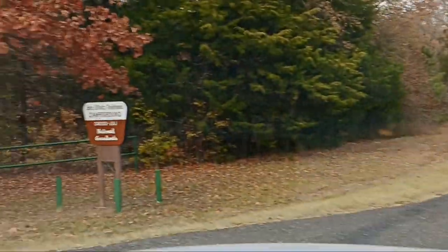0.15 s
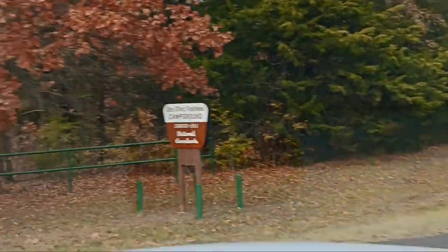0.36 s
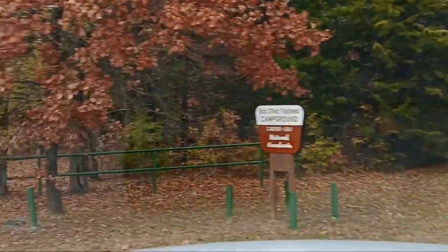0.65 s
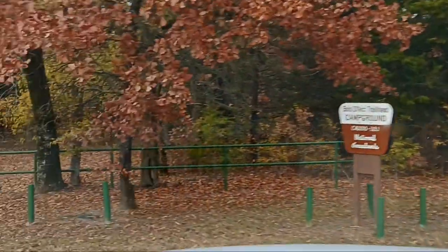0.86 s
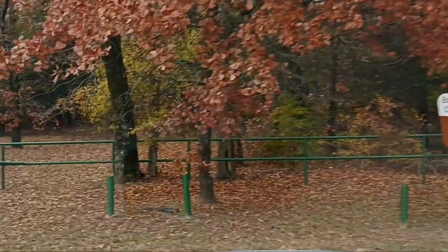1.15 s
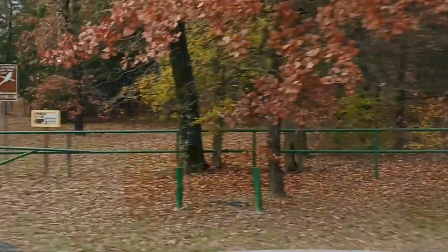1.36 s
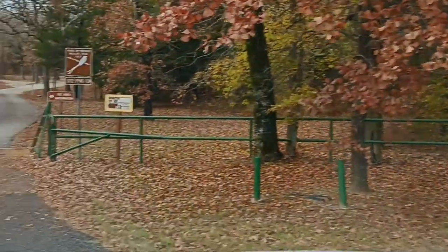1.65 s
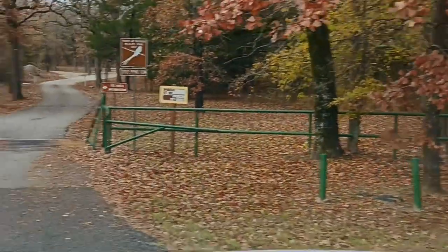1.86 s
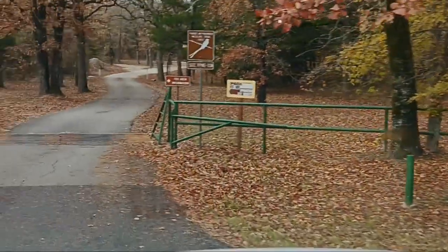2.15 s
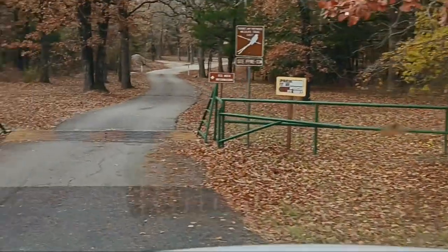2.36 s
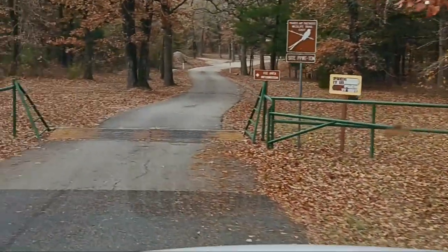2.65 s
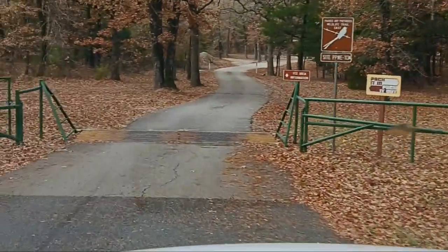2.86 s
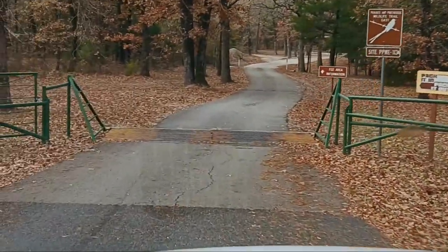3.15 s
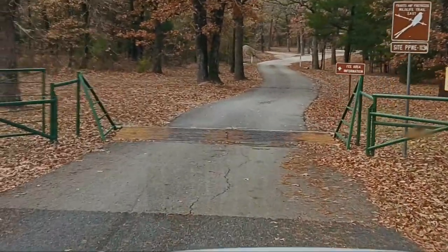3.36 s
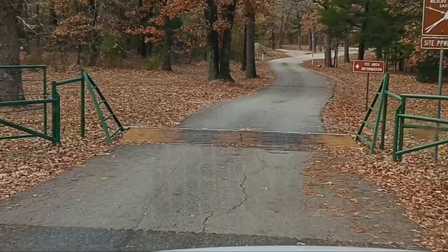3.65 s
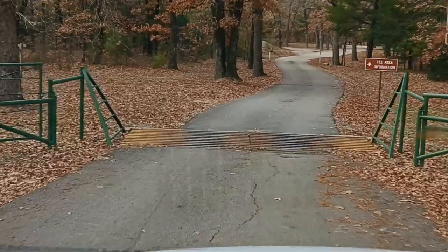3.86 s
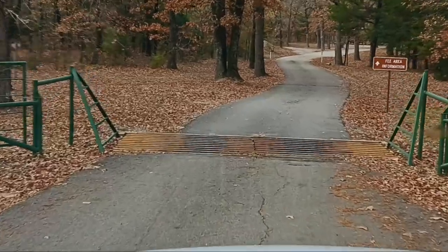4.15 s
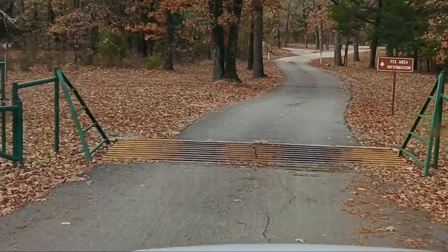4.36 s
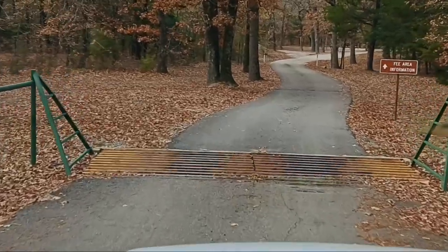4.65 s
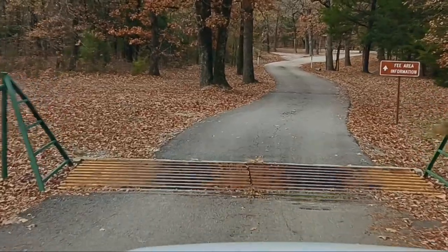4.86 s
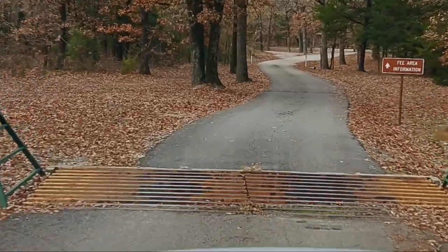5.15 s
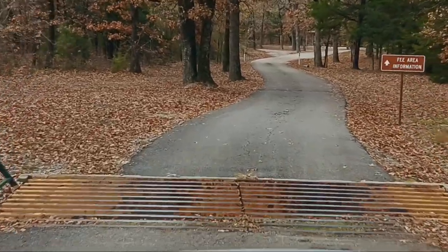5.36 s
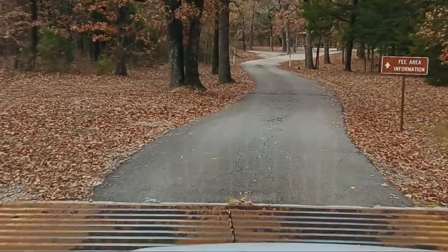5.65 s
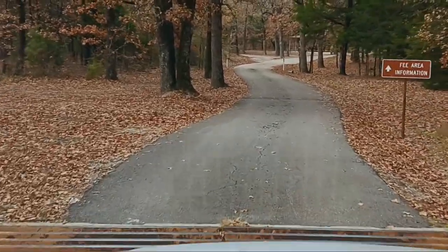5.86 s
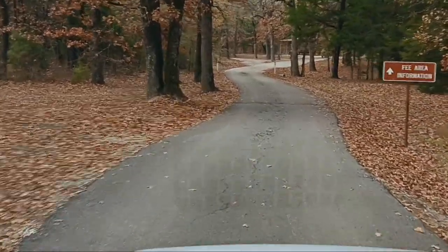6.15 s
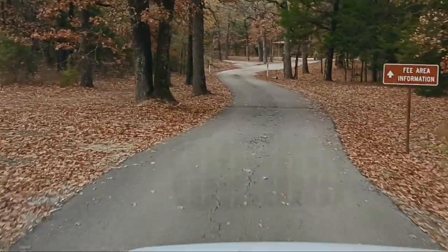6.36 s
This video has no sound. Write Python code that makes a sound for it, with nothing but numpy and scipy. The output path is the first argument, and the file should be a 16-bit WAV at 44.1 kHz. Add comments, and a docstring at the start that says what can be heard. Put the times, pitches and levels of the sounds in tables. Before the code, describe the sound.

Inside a slowly turning car, low engine hum and road rumble underlie an even turn-signal tick that snaps off, then hand rustles and small creaks.

```python
"""Inside a car that turns slowly into a lane, heard at two microphone ports near the windscreen.
From the start the engine hums on its firing orders over banded road rumble, buzzing panels and a hiss of air.
Trim snaps follow, then the struck modes of an indicator relay tick on and off until the stalk snaps back;
palms slide round the wheel as patchy hiss with squeaks, while the steering pump whines up and eases away.
Creaks go on to the end. Each port colours everything with its own cavity resonance."""
import sys
import numpy as np
from scipy import signal
from scipy.fft import rfft, irfft, next_fast_len
from scipy.io import wavfile
from scipy.ndimage import uniform_filter1d

SR = 44100
rng = np.random.default_rng(int(sys.argv[2]) if len(sys.argv) > 2 else 0)


def master(y):
    """Save y as 16-bit WAV."""
    cut = np.clip(np.atleast_2d(y).T, -1, 1)
    pcm = np.round(cut * 32767)  # scale
    wavfile.write(sys.argv[1], SR, pcm.astype(np.int16))


N = 286650
T = np.arange(N) / SR  # scene time, s
SIZE = next_fast_len(N + 8192)
HZ = np.arange(SIZE // 2 + 1) * SR / SIZE
BURST = np.arange(4500) / SR  # time within a short sound, s


def undb(db):
    """dB to gain."""
    return 10 ** (np.asarray(db) / 20)


def unit(x):
    """Scale to rms 1."""
    return x / np.sqrt(np.mean(x ** 2))


def curves(table):
    """Interpolate the columns of a table over time, sample by sample."""
    s, *columns = np.transpose(table)
    return [np.interp(T, s, column) for column in columns]


def walk(rate):
    """Random levels held 1 / rate s and slewed twice; spread near 1."""
    held = np.repeat(rng.standard_normal(int(N / SR * rate) + 2), 8)
    once = uniform_filter1d(held, size=8)
    slewed = unit(uniform_filter1d(once, size=8))
    return np.interp(T * rate * 8, np.arange(len(held)), slewed)


def ring(x, hz, width_hz):
    """One resonance, gain 1 at its centre."""
    return signal.lfilter(*signal.iirpeak(hz, hz / width_hz, fs=SR), x)


def late_left(x):
    """The sound from floor and engine bay reaches the right port first, the left 0.95 ms later."""
    lag = int(0.00095 * SR)
    return np.array([np.pad(x, (lag, 0), mode="reflect")[:N], x])


def decay(t, t60):
    """Exponential fall by 60 dB in t60 s."""
    return 1000. ** (-t / t60)


def cabin(t60, rise):
    """Envelope of the dense early echoes of glass and seats: exponential rise, then decay."""
    return (1 - np.exp(-BURST / rise)) * decay(BURST, t60)


def reflections():
    """Early echoes at both ports: noise in clumps under a millisecond long; rms 1 over both."""
    clumps = np.repeat(rng.standard_normal((2, len(BURST) // 30)), 30, axis=1)
    return unit(undb(4 * clumps) * rng.standard_normal((2, len(BURST))))


def add(out, s, burst):
    """Mix a burst in at time s."""
    i = int(s * SR)
    out[:, i:i + burst.shape[1]] += burst[:, :N - i]


def engine():
    """Orders of the engine, wavering several times a second in pitch and level; the pump whines in turns."""
    # Engine speed and load. Each row: time in seconds, base order (the lowest hum tone) in Hz, load in dB.
    speed_load = [(0, 33.38, 0.5), (.4, 34.37, 1), (1, 34.93, -0.5), (1.45, 35.17, -0.5), (1.74, 37.48, -3),
                  (1.92, 37.23, -3), (2.1, 36.29, -4.5), (2.4, 35.91, -2.5), (3.1, 35.17, -2.5),
                  (3.6, 35.46, -2), (4.4, 34.96, -2), (4.75, 35.6, -3), (5.3, 35.5, -4), (5.9, 35.09, -3),
                  (6.5, 34.8, -4.5)]
    # Orders that follow the load. Each row: multiple of the base order, level in dB.
    loaded_orders = [(1, -43.5), (2, -20), (3, -24.5)]
    # Orders at steady mean level, whatever the load. Each row: multiple of the base order, level in dB.
    steady_orders = [(1.5, -45), (2.5, -53.5), (3.5, -56.5), (4, -37), (4.5, -39), (5, -52.5), (6, -49.5),
                     (6.5, -49.5), (7.5, -47), (9, -54)]
    # The seventh order booms while the wheel is turned in. Each row: time in seconds, level in dB.
    seventh = [(0, -48.5), (.7, -47.5), (.9, -38.5), (1.5, -39.5), (1.8, -49.5), (6.5, -54)]
    pump_order, full_lock_s = 8.55, 1.74
    pump_peak_db, pump_idle_db = -33.5, -55
    pump_rise_db_s, pump_ease_db_s = 83.5, 5.5

    hz, load_db = curves(speed_load)
    phase = 2 * np.pi * np.cumsum(hz * (1 + 0.0016 * walk(9))) / SR
    # the pump is loudest at full lock, then eases as the wheel unwinds
    since = T - full_lock_s
    pump_db = pump_peak_db + np.minimum(pump_rise_db_s * since, -pump_ease_db_s * since)
    pump_db = np.maximum(pump_db, pump_idle_db)
    orders = [(multiple, db + load_db) for multiple, db in loaded_orders]
    orders += [(pump_order, pump_db), (7, curves(seventh)[0])]
    orders += steady_orders
    hum = 0
    for multiple, db in orders:
        hum = hum + undb(db + 0.39 * walk(8.1)) * np.sin(multiple * phase)
    return late_left(np.sqrt(2) * hum)


def road_levels():
    """Running levels of boom, floor pan and roar: the uneven lane makes them swell, sink and jolt."""
    # Road noise through the body. Each row: time in seconds, then suspension boom, floor pan
    # and tyre roar, each in dB.
    rumble = [(0, -23.5, -34, -57), (.9, -25.5, -34.5, -52), (1.6, -27, -36.5, -56),
              (2.4, -31.5, -39.5, -55.5), (3.2, -28.5, -39.5, -59.5), (4.0, -31.5, -39.5, -58),
              (4.6, -28.5, -39, -60.5), (5.4, -30, -39.5, -59), (6.5, -26, -39.5, -59.5)]
    # Bumps in the lane. Each row: peak time in seconds, then the shift of boom, floor pan
    # and roar against the running level, each in dB; a negative shift is a dip.
    bumps = [(0.159, 9.5, 1, 5), (.5, 2.5, -0.5, 6.5), (1.0, 2, -1, -3.5), (1.81, -3, 2.5, 7.5),
             (1.96, -1, 2, 0.5), (2.23, 0.5, 1, 11.5), (2.95, -4, 4, 6.5), (3.33, 4.5, -3.5, -1),
             (3.901, 5, -1, 2.5), (5.069, 4.5, 5, 9.5), (5.951, -5, 4, 10), (6.101, 1, 8.5, 2)]
    lump_db = (0.5, 1.5, 3)  # spread of boom, floor pan, roar
    bump_rise_s, bump_fall_s = 0.17, 0.09

    levels = np.array(curves(rumble)) + np.array([db * walk(7) for db in lump_db])
    for s, *lift_db in bumps:
        rise = 1 + (T - s) / bump_rise_s
        fall = 1 - (T - s) / bump_fall_s
        levels = levels + np.array(lift_db)[:, None] * np.clip(np.minimum(rise, fall), 0, 1)
    return levels


def road():
    """Third-octave bands of body noise, each flickering alone and partly alike at the two ports."""
    # Road colour about the running levels. Each row: frequency in Hz, level in dB in a third octave,
    # likeness of left to right from 0 to 1.
    colour = [(17.6, -10.5, 0.98), (31.5, -3, 0.94), (49, -9.5, 0.98), (63.1, -0.5, 0.97), (88.6, -6, 1),
              (113.5, 7, 0.6), (155, 0.5, 1), (223, -1.5, 0.8), (342, -6.5, 0.9), (424, -10, .6),
              (510, -7, 0.2), (850, -17.5, 0.02), (1260, -14, 0.01), (2320, -21.5, 0.6), (3270, -23, 0.05),
              (4200, -30.5, 0.05)]
    # Centres in Hz of suspension boom, floor pan and tyre roar.
    source_hz = (40, 240, 700)

    levels = road_levels()
    shared, own_left = np.zeros((2, N)), 0
    colour_hz, colour_db, like = np.transpose(colour)
    for hz in 16 * 2 ** (np.arange(25) / 3):
        bins = HZ[HZ < 1.3 * hz]
        octaves = np.abs(np.log2((bins + 1e-9) / hz))
        band = np.clip(1 - 3 * octaves, 0, 1) ** .5
        noise = irfft(band * np.exp(2j * np.pi * rng.random((2, len(bins)))), SIZE)[:, :N]
        db = np.interp(np.log(hz), np.log(colour_hz), colour_db)
        likeness = np.interp(np.log(hz), np.log(colour_hz), np.clip(like, 0, 1))
        # each band follows the level of its nearest source
        nearest = np.argmin(np.abs(np.log(hz / np.array(source_hz))))
        noise = undb(levels[nearest] + db + 2.4 * walk(6)) * unit(noise)
        shared += [[likeness], [1]] * noise[0]
        own_left = own_left + np.sqrt(1 - likeness ** 2) * noise[1]
    return np.array([late_left(shared[0])[0] + own_left, shared[1]])


def panels():
    """Door and dash panels: narrow resonances fed by the roar, waking and resting, and single buzzes."""
    # Panels that buzz with the tyre roar. Each row: pitch in Hz, width in Hz, level in dB against the roar.
    resonances = [(589, 110, -3.5), (897, 150, -13), (1226.6, 25, -20), (1680, 240, -23.5),
                  (2450, 390, -22)]
    # Single panel buzzes. Each row: start in seconds, length in seconds, pitch in Hz, level in dB.
    buzzes = [(0.42, .1, 598, -50), (0.55, 0.26, 1190, -57), (0.618, .12, 626, -51), (1.122, .06, 680, -50),
              (1.396, 0.053, 930, -57), (1.76, .06, 620, -50), (2.402, .25, 605, -57),
              (3.852, .25, 577, -61), (4.97, .05, 1220, -63), (5.001, .05, 880, -58), (5.0, .04, 1550, -60),
              (5.06, 0.032, 622, -48), (5.108, 0.037, 585, -54.5), (5.122, 0.048, 907, -56),
              (5.343, 0.056, 910, -56), (5.8, .15, 448, -51), (6.099, 0.28, 599, -57)]

    roar_db, out = road_levels()[2], 0
    for hz, width, db in resonances:
        buzz = ring(ring(rng.standard_normal((2, N)), hz, width), hz, width)
        out = out + undb(roar_db + db + 4.2 * walk(14)) * unit(buzz)
    for s, length, hz, db in buzzes:
        buzz = ring(ring(rng.standard_normal((2, N // 8)), hz, hz / 14), hz, hz / 14)
        buzz = buzz[:, -int(length * SR):]  # the settled end of the ringing
        add(out, s, undb(db) * unit(buzz) * np.hanning(buzz.shape[1]) ** .5)
    return out


def creaks():
    """Each snap is crack, sizzle, ringing body, broad clack and longer thud, spread by the cabin."""
    # Snaps and creaks of stalk, wheel and trim. Each row: time in seconds, crack in dB, sizzle in dB,
    # body pitch in Hz, body in dB, broad clack in dB, thud in dB, left minus right in dB.
    snaps = [(0.108, -57, -66, 9900, -56.5, -75, -72, -8), (0.409, -66, -80, 3000, -67, -61.5, -57, -2),
             (0.455, -56, -70, 3800, -56, -52.5, -54, 1), (0.4733, -18.5, -49, 4040, -36, -68, -47, -7),
             (0.5144, -46, -66, 3000, -63, -72, -41, 1), (1.0618, -73, -85, 2160, -48, -64, -39.5, -5),
             (1.1245, -27.5, -42, 10000, -39, -47, -38, -3), (1.5817, -48.5, -75, 3000, -63, -70, -71, -3),
             (1.721, -39, -49, 2480, -30, -33.5, -53, 7), (1.732, -56, -48, 2000, -34, -37.5, -45, 5),
             (1.744, -67, -50, 1910, -35, -41.5, -55, -5), (1.813, -38, -66, 3740, -57, -71, -62, -10),
             (1.8823, -33.5, -49, 3430, -48, -39, -60, -2), (2.048, -46, -65, 3270, -46, -52, -44, -6),
             (2.095, -27.5, -52, 2430, -32, -62, -62, -4.5), (2.115, -60, -58, 2480, -55, -44, -66, 8),
             (2.1443, -21, -32, 1700, -32, -29, -54, -6.5), (2.1536, -19, -42, 3220, -40, -22, -40, -3),
             (2.178, -31, -35, 1900, -33, -26, -29.5, 0), (2.1936, -42, -48, 1610, -30, -33, -30, -0.5),
             (2.2423, -23.5, -31, 3640, -36, -37, -55, -3), (2.2538, -50, -60, 988, -27, -43, -62, 9),
             (2.2536, -35, -40, 3800, -26.5, -28, -50, 2.5), (2.351, -48, -62, 3100, -51, -62, -68, -1),
             (2.383, -46, -58, 3630, -47, -49.5, -63, -2), (2.718, -42.5, -46, 9970, -41, -54.5, -43, 0),
             (2.742, -46, -64, 10100, -44, -61, -68, 2), (2.698, -57, -64, 7040, -65, -70, -66, -7),
             (2.82, -53, -72, 10900, -51, -66, -69, -4), (2.899, -46, -60, 9900, -52, -66, -66, -4),
             (2.9388, -50, -66, 4700, -46, -62, -61, -3), (3.0446, -60, -66, 11000, -49, -72, -66, -4),
             (3.084, -39, -58, 4470, -51, -57, -55, -2), (3.1403, -34, -48, 3440, -57, -51, -64, 4.5),
             (3.541, -57, -69, 10340, -60, -73, -66.5, -7),
             (3.5716, -53, -71, 10000, -52.5, -58, -54.5, -4),
             (3.582, -32.5, -42.5, 3190, -48, -50.5, -59, 5),
             (3.623, -60.5, -69, 10500, -60, -80, -70.5, -5),
             (3.8765, -76, -91, 3590, -59.5, -61.5, -58.5, 3), (3.947, -77, -83, 3830, -63, -63, -58, 0.5),
             (4.7655, -79, -87.5, 4780, -59, -66, -63.5, 3.5), (4.9738, -79, -77, 1300, -58.5, -68, -57, 6),
             (5.012, -70, -84, 1550, -47.5, -70, -49, 4.5), (5.048, -58.5, -69, 2187, -36, -56, -30, 0),
             (5.049, -69.5, -80, 1430, -39.5, -63.5, -59, 4),
             (5.0665, -53.5, -66, 2060, -48.5, -60, -40.5, 3.5),
             (5.131, -70.5, -86, 900, -45, -71, -59.5, 0), (5.151, -71, -88, 890, -40, -71, -57.5, -2.5),
             (5.352, -80.5, -95.5, 924, -43.5, -68.5, -61, -2),
             (5.376, -81.5, -91.5, 920, -43, -72, -59.5, -2),
             (5.358, -68, -83, 5240, -63.5, -80, -55.5, -1.5), (5.5287, -53, -75, 3000, -68, -75, -61, -2),
             (5.586, -61.5, -83, 3000, -72, -86, -63.5, -5), (5.6138, -62, -78, 2990, -77, -84, -74, -3),
             (5.679, -60.5, -76, 3000, -73.5, -77.5, -66.5, -4),
             (5.7256, -57, -70, 3000, -68, -75, -64, -1), (5.742, -69, -83, 4400, -61, -67, -62, 2),
             (5.751, -79, -73, 4400, -61, -55.5, -57, 6), (5.7924, -74, -67, 5400, -51, -58.5, -60, 0),
             (5.8304, -60, -72, 10000, -62, -60, -44.5, -3), (5.841, -72, -80, 3360, -57, -58.5, -52, 1),
             (5.885, -54, -64, 9940, -56, -66, -66, -5.5), (5.886, -60, -70, 8050, -50.5, -62, -60, 0),
             (5.887, -70, -70, 3500, -63, -56, -56, -2), (5.925, -64, -76, 3500, -64, -62, -56, 3),
             (5.9547, -50, -58, 1540, -37.5, -52, -55, 1),
             (5.957, -28.5, -45.5, 3090, -33.5, -62, -54, 0.5)]
    ticks_per_s, tick_db = 2.5, -74  # faint trim ticks at random; the lowest crack level
    snap_t60_s, body_t60_s, thud_t60_s = 0.062, 0.025, 0.064
    body_width = 0.14  # as a share of the pitch
    body_ring_share, body_ring_cycles = 0.45, 70  # the body also rings clean; cycles to fall 60 dB
    thud_hz, knock_share = (536, 680.7), 0.8  # tones of the trim panel behind each thud

    out = np.zeros((2, N))
    crack_band = signal.butter(2, (4500, 11000), "band", fs=SR, output="sos")
    thud_band = signal.butter(3, (450, 830), "band", fs=SR, output="sos")
    sizzle_band = signal.butter(2, 11000, "high", fs=SR, output="sos")
    knock = sum(np.sin(2 * np.pi * hz * BURST) for hz in thud_hz) * cabin(thud_t60_s, rise=0.0016)
    snap_shape = cabin(snap_t60_s, rise=0.0039) + 0.96 * cabin(0.014, rise=0.0009)  # direct path leads
    # hard contact: short, little echo
    blow_shape = cabin(body_t60_s, rise=0.0012) + 0.4 * cabin(snap_t60_s, rise=0.004)
    ticks = []
    for when, loud, pitch, side in rng.random((int(ticks_per_s * N / SR), 4)):
        ticks.append((when * N / SR, tick_db + 12 * loud, tick_db - 12, 2200 + 2500 * pitch,
                      tick_db + 3, tick_db + 4, tick_db + 10, 12 * (side - .5)))

    for s, crack_db, sizzle_db, hz, body_db, broad_db, thud_db, pan_db in snaps + ticks:
        paths = reflections()
        echo = paths * snap_shape
        blow = paths * blow_shape
        width = body_width * hz
        # the narrower a part, the less of the blow it passes: plain factors make up for that
        crack = undb(crack_db) * signal.sosfilt(crack_band, echo)
        sizzle = 3.8 * undb(sizzle_db) * signal.sosfilt(sizzle_band, echo)
        body = 6 * undb(body_db) * ring(ring(blow, hz, width), hz, width)
        clack = 3 * undb(broad_db) * ring(echo, 2300, 4500)
        clean = np.sin(2 * np.pi * hz * BURST) * cabin(body_ring_cycles / hz, rise=0.002)
        clean = body_ring_share * undb(body_db) * clean
        thump = 6 * signal.sosfilt(thud_band, paths * cabin(0.077, rise=0.00063))
        thud = undb(thud_db) * (knock_share * knock + thump)
        snap = crack + sizzle + body + clack + clean + thud
        add(out, s - .001, snap * undb(np.array([[pan_db], [-pan_db]]) / 2))
    return out


def relay():
    """A short blow rings case and bracket; the cabin answers every tick much alike."""
    # Times in seconds at which the relay closes, and at which it opens.
    closing = [0.1362, 0.474, 0.817, 1.1761, 1.4967, 1.8372, 2.1785]
    opening = [0.3093, 0.6497, 0.9903, 1.3296, 1.6807, 2.012]
    # Modes of case and bracket. Each row: pitch in Hz, 60 dB decay in seconds,
    # relative level in dB when closing, relative level in dB when opening.
    case_modes = [(985, 0.05, -18, -3), (1844, 0.035, -3.5, -20), (620, 0.02, -12.5, -12.5),
                  (1420, 0.012, -14.5, -24), (2390, 0.019, -9, -20), (2890, 0.0072, -5, -18),
                  (3136, 0.0097, -2.5, -14), (4220, 0.003, 1, -36), (6290, 0.012, -5, -5.5),
                  (6960, 0.0071, -4, -4), (8150, 0.0038, 3, -2), (9860, 0.0032, -1, -7.5),
                  (12170, 0.0012, -1, -2.5), (12900, 0.0031, -1, -8), (14300, 0.0013, 5.5, 5.5),
                  (15830, 0.0017, -4, 8.5)]
    tick_db = (-22.5, -25.5)  # energy of a closing, an opening blow before the echoes
    mode_late_s = (0.006, 0.003)  # the first two modes come through the dash, late
    dash_db, dash_swell_s = -7, 0.0036  # those two also ring straight through the dash
    swell_cycles = 2  # the other modes swell in over a few cycles
    fresh_share = 0.35  # gain of the echoes that are new at each tick
    echo_t60_s, echo_rise_s = np.array([[0.066], [0.065]]), 0.0024  # decay at left, right port
    left_late_s = 0.0029  # the relay sits nearer the right

    out, paths, t = np.zeros((2, N)), reflections(), np.arange(2000) / SR
    hz, t60, *mode_db = np.array(case_modes).T[:, :, None]
    low = len(mode_late_s)
    t = np.maximum(t - np.pad(mode_late_s, (0, len(hz) - low))[:, None], 0)
    echo_t = np.maximum(BURST - np.array([[left_late_s], [0]]), 0)
    shape = (1 - np.exp(-echo_t / echo_rise_s)) * decay(echo_t, echo_t60_s)
    dash = undb(dash_db) * np.sqrt(np.sum(shape ** 2, axis=1, keepdims=True))
    swell_s = np.where(np.arange(len(hz))[:, None] < low, dash_swell_s, swell_cycles / hz)
    envelope = (1 - np.exp(-t / swell_s)) * decay(t, t60) / np.sqrt(t60)
    for times, level_db, db in zip((closing, opening), tick_db, mode_db):
        for s in times:
            scatter = undb(1.8 * rng.standard_normal(db.shape))
            detune = 1 + .015 * rng.standard_normal(db.shape)
            modes = scatter * undb(db) * np.sin(2 * np.pi * hz * detune * t) * envelope
            modes = modes * undb(level_db) / np.sqrt(np.sum(modes ** 2))
            echo = (paths + fresh_share * reflections()) * shape
            add(out, s - .0003, signal.fftconvolve(echo, modes.sum(axis=0)[None]))
            add(out, s - .001, dash * modes[:low].sum(axis=0))
    return out


def squeaks():
    """Brief narrow squeaks of skin on the rim, each at its own pitch and side."""
    per_s, loudest_db, t60_s = 110, 12.5, 0.035  # level against the slide
    out = np.zeros((2, N))
    for when, pitch, soft, side in rng.random((int(per_s * N / SR), 4)):
        hz = 3500 * 4 ** pitch
        tone = (np.sin(2 * np.pi * hz * BURST) * cabin(t60_s, rise=0.003))[:2000]
        add(out, when * N / SR, undb(loudest_db - 12 * soft) * tone * np.array([[side], [1 - side]]))
    return out


def palms():
    """Skin dragging over the rim: patchy hiss catching in tiny slips, fading to the steady air noise."""
    # Palms sliding round the wheel, one row a stroke. Each row: start of the hold in seconds,
    # hold in seconds, level in dB before the colour, left minus right in dB.
    strokes = [(0.48, 0.054, -73, 6), (0.74, 0.094, -73.5, -2), (0.854, 0.14, -70, -8),
               (0.957, .02, -69.5, 2), (1.297, 0.02, -70.5, 1), (1.74, 0.18, -62.5, -2),
               (2.028, 0.3, -55, -1.5), (2.279, 0.038, -49, -2), (2.352, 0.029, -51.5, -5),
               (2.443, 0.093, -54, -0.5), (2.538, 0.061, -56, -1), (2.64, 0.06, -71.5, 1),
               (2.732, 0.17, -59.5, -1), (2.905, 0.081, -53, -2.5), (2.992, 0.058, -57.5, -4),
               (3.094, 0.061, -54, -0.5), (3.187, 0.031, -57.5, -3.5), (3.275, 0.012, -68, -10),
               (3.389, 0.12, -74, -6), (3.531, 0.016, -66, -4)]
    # Colour of the hiss. Each row: centre in Hz, width in Hz, level in dB.
    slide_bands = [(2200, 3700, -7.5), (4140, 1500, -12.5), (7300, 2500, 4), (9800, 710, 3),
                   (12700, 3300, 0.5)]
    air_db = -81  # air past the glass, before the same colour
    grab_db_s, let_go_db_s = 253, 327
    slips_per_s, slip_decay_s = 260, 0.0017

    # each stroke swells in, holds and dies away; the loudest one counts
    sides = np.array([[.5], [-.5]])
    stroke_db = []
    for s, hold, db, pan_db in strokes:
        edges_db = np.minimum(grab_db_s * (T - s), let_go_db_s * (s + hold - T))
        stroke_db.append(db + pan_db * sides + np.minimum(edges_db, 0))
    slide = undb(np.max(stroke_db, axis=0))
    slips = (rng.random(N) < slips_per_s / SR) * undb(2.8 * rng.exponential(size=N))
    grip = 1 + 0.22 * signal.lfilter([1], [1, -np.exp(-1 / (slip_decay_s * SR))], slips)
    noise, patches = rng.standard_normal((2, N)), 0
    for hz, width, db in slide_bands:
        patches = patches + undb(db + 2.9 * walk(35) + 1.6 * walk(160)) * ring(noise, hz, width)
    return (slide + undb(air_db)) * grip * patches + slide * squeaks()


def scene():
    """All sources at the two ports."""
    return engine() + road() + panels() + creaks() + relay() + palms()


def record(dry):
    """Each port has a small cavity that lifts its own pitch, and dulls the top; then the top is cut."""
    # Left port, then right. Each row: cavity pitch in Hz, width in Hz, lift in dB at the cavity,
    # level in dB below it, corner in Hz above which the port is dull.
    cavities = [(6835, 900, 16.5, -3.5, 6370), (10330, 1000, 12, -2, 11000)]
    top_hz = 15900
    ports = []
    for hz, width, db, low_db, dull_hz in cavities:
        off_tune = (HZ - hz ** 2 / (HZ + 1)) / (2 * width)
        cavity = 1 + (undb(db / 2) - 1) / (1 + 1j * off_tune)
        ports.append(undb(low_db) * cavity ** 2 / (1 + 1j * HZ / dull_hz))
    # mirrored ends let the filters settle outside the scene
    running = np.pad(dry, ((0, 0), (2048, 2048)), mode="reflect")
    wet = irfft(rfft(running, SIZE) * np.array(ports), SIZE)
    top_cut = signal.ellip(8, .2, 70, top_hz, fs=SR, output="sos")
    return signal.sosfilt(top_cut, wet)[:, 2048:2048 + N]


dry = scene()
out = record(dry)
master(out)
```